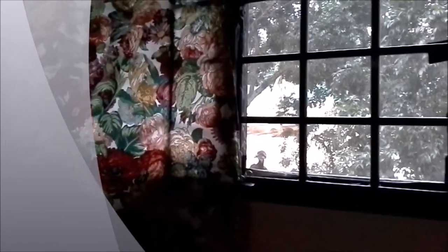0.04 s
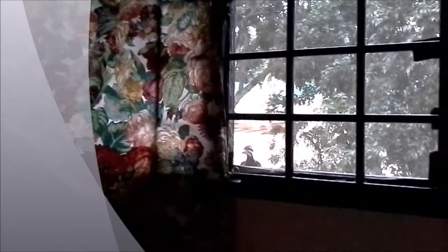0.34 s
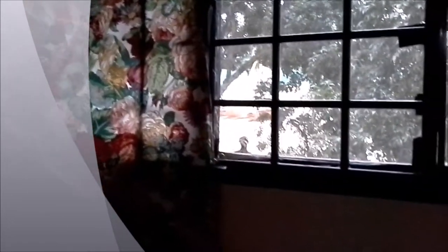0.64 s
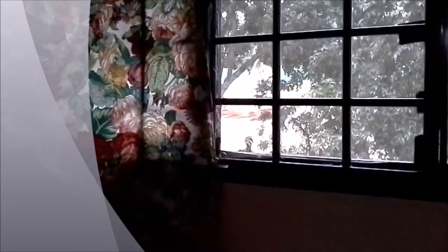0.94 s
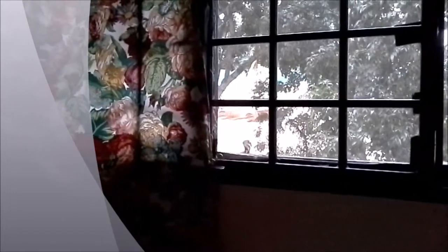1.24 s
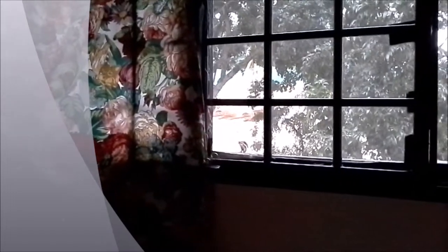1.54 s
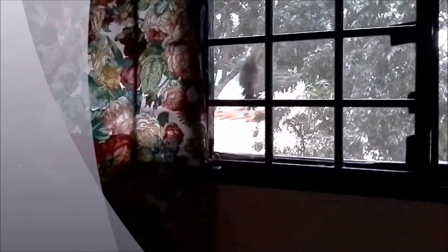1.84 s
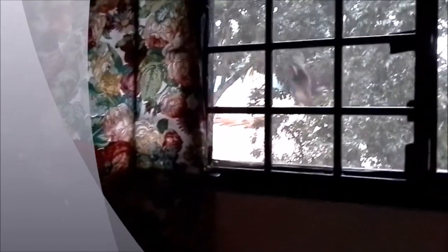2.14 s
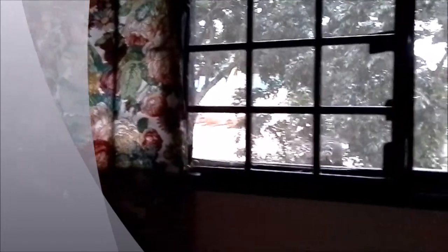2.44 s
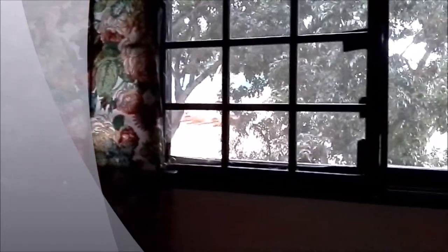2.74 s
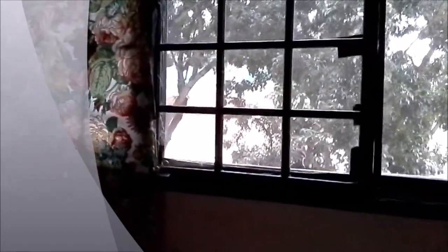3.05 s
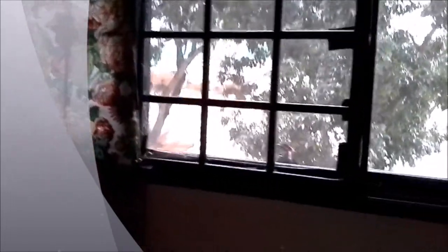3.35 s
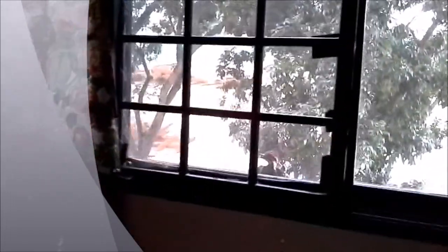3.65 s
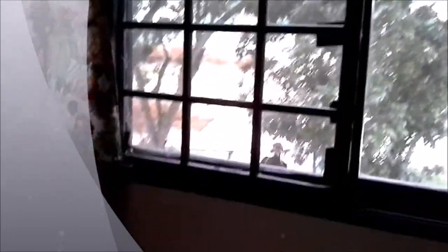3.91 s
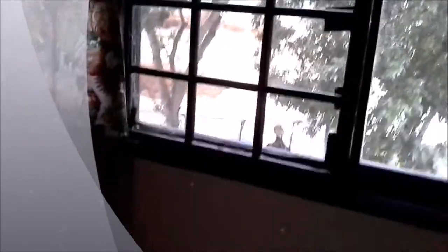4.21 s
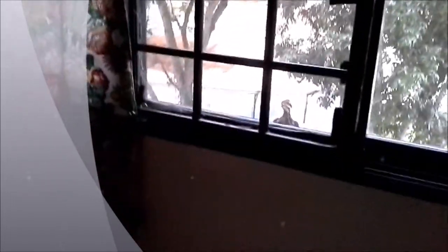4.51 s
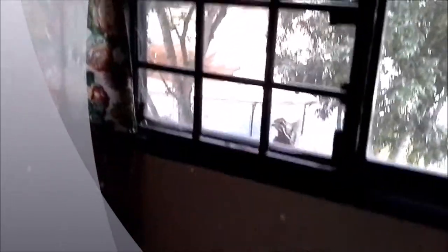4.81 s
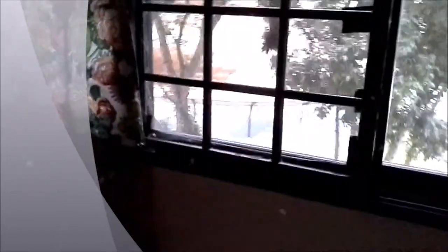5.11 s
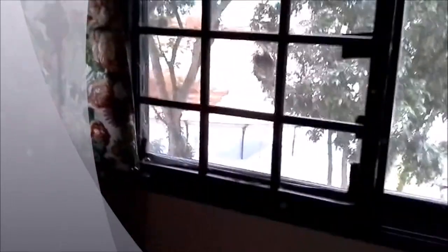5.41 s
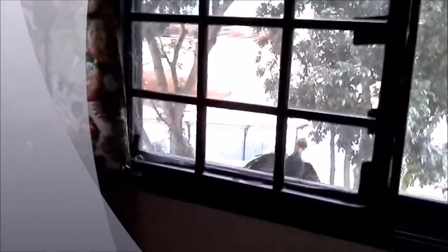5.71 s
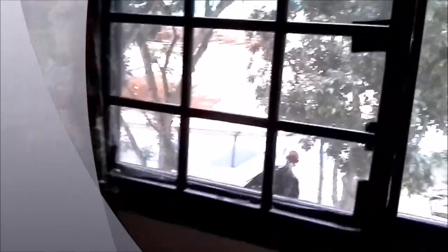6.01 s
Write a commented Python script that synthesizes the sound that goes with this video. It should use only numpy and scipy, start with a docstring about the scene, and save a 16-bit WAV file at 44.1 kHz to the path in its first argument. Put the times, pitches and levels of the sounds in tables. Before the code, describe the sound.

A bird knocks sharply three times on a barred window, with faint claw scratches, light taps and soft clothing rustle, heard from indoors.

```python
"""A woodpecker knocks three times on a steel-barred window, heard from inside a small room.
Each blow bends the pane, rattles it in its frame and sets the bars ringing. Around the blows
its claws scuff and squeak, and there are a few light taps. Clothing rustles as someone carries
a phone, and a quiet hum from outdoors comes through the glass all the while."""
import sys
import numpy as np
from scipy import signal
from scipy.fft import rfft, irfft, next_fast_len
from scipy.io import wavfile
from scipy.ndimage import uniform_filter1d

SR = 44100
rng = np.random.default_rng(int(sys.argv[2]) if len(sys.argv) > 2 else 0)


def dump_mix(stems):
    """Bounce the given channels to the path in sys.argv[1] as a 16-bit WAV at rate SR."""
    frames = np.atleast_2d(stems).T  # one column per channel
    limited = np.clip(frames, -1, 1)  # hard clip at full scale
    pcm = np.round(limited * 32767).astype(np.int16)
    wavfile.write(sys.argv[1], SR, pcm)


N = 267510
TOP_HZ = 14750


def undb(db):
    """Turn decibels into a number to multiply a sound by."""
    return 10 ** (np.asarray(db) / 20)


def lookup(points, hz):
    """Read between (frequency, value) points, giving every octave the same width."""
    f, value = np.transpose(points)
    return np.interp(np.log(np.maximum(hz, 1)), np.log(f), value)


def wander(rate_hz):
    """A smooth random drift, usually between about -1 and 1."""
    step = max(int(SR / rate_hz), 1)
    x = uniform_filter1d(np.repeat(rng.standard_normal(N // step + 1), step), step)[:N]
    return x / x.std()


def ring(modes, t, scatter_db=0, apart=0):
    """A struck thing rings in fading tones (modes), each reaching an ear up to `apart` cycles late."""
    sound = 0
    for hz, db, t60 in modes:  # t60 is the time to fade by 60 dB
        strength = undb(db + scatter_db * rng.uniform(-1.24, 1))
        fade = np.exp(-np.log(1000) * t / t60)
        lag = apart * rng.random((2, 1))
        sound = sound + strength * fade * np.sin(2 * np.pi * (hz * t - lag))
    return sound


def add(track, s, sound):
    """Mix a sound into the track, starting at s seconds."""
    i = int(s * SR)
    track[:, i:i + sound.shape[-1]] += sound[..., :N - i]


# how alike the two ears hear a noise (1 is identical): f/Hz, likeness
EAR_LIKENESS = [(60, 0.68), (125, 0.65), (250, 0.63), (500, 0.44), (1000, 0.059), (4000, 0.039)]


def noise(colour, size):
    """Stereo noise, alike in both ears in the bass; its colour sets how strong each frequency is."""
    padded = next_fast_len(size)
    hz = np.fft.rfftfreq(padded, 1 / SR)
    alike = np.clip(lookup(EAR_LIKENESS, hz), -1, 1)
    mid, side = np.exp(2j * np.pi * rng.random((2, len(hz))))
    pair = mid * np.sqrt(1 + alike) + np.array([[1], [-1]]) * side * np.sqrt(1 - alike)
    x = irfft(pair * undb(lookup(colour, hz)) * (hz > 20) * (hz < TOP_HZ), padded)[:, :size]
    return x / x.std()


# colour of the room's echo: f/Hz, level/dB
TAIL_COLOUR = [(50, -0.5), (160, 7.5), (400, 5.5), (1000, 5.5), (2500, 2.5), (5000, 0.5), (8000, 2),
               (10500, -0.5), (14000, -7)]
# how long that echo lasts: f/Hz, fade time/s
TAIL_FADE = [(100, 0.4), (400, 0.29), (1500, 0.28), (4000, 0.26), (8000, 0.27), (14000, 0.41)]
# first echoes off the window recess and floor: left delay/s, right delay/s, gain
FIRST_ECHOES = [(.0022, .0024, 0.32), (.0042, .0041, 0.18), (.0060, .0059, .42)]


def room(x, direct_db, wet_db, build_s):
    """A sound arrives directly, then as three quick echoes and a fading wash of many more (wet_db)."""
    t = np.arange(SR // 2) / SR
    hz = np.fft.rfftfreq(len(t), 1 / SR)
    spectrum, tail = rfft(noise(TAIL_COLOUR, len(t))), 0
    for centre, t60 in TAIL_FADE:
        band = lookup([(f, float(f == centre)) for f, _ in TAIL_FADE], hz)
        tail = tail + irfft(spectrum * band, len(t)) * np.exp(-np.log(1000) * t / t60)
    tail *= 1 - np.exp(-t / build_s)
    response = undb(wet_db) * tail / np.sqrt(np.sum(tail ** 2) / 2)
    response[:, 0] += undb(direct_db)
    for left_s, right_s, gain in FIRST_ECHOES:
        response[[0, 1], [int(left_s * SR), int(right_s * SR)]] += gain * undb(direct_db)
    return signal.fftconvolve(x, response, axes=1)[:, :x.shape[-1]]


# colour of the outdoor hum: f/Hz, level/dB
HUM_COLOUR = [(25, -13), (45, -11.5), (85, -3), (150, -1.5), (260, -7), (400, -6), (600, -6.5), (1000, -13),
              (1800, -18.5), (3500, -22), (8000, -23.5), (14500, -25)]


def outdoors(level_db=-64.5):
    """A dull, steady hum comes through the closed window, with a thin hiss on top."""
    return noise(HUM_COLOUR, N) * undb(level_db)


CARRIED_FROM_S = 3.0
# sweeps of clothing: start/s, fullest/s, end/s, level/dB, swell from either end to the fullest/dB
CLOTH_SWEEPS = [(2.99, 4.1, 4.61, -56, 9), (4.964, 5.723, 5.83, -59.3, 1.8)]


def sliding(held_db=-81, carried_db=-73.5, attack_s=0.037, release_s=0.037, peakedness=1.7):
    """How hard the fabric slides: never quite still, more once the phone is carried, most in sweeps."""
    t = np.arange(N) / SR
    power = undb(np.where(t < CARRIED_FROM_S, held_db, carried_db)) ** 2
    for start, fullest, end, db, swell_db in CLOTH_SWEEPS:
        moving = np.clip((t - start) / attack_s, 0, 1) * np.exp(-np.maximum(t - end, 0) / release_s)
        up_and_down = np.interp(t, [start, fullest, end], [0, 1, 0])
        arc = np.sin(np.pi / 2 * up_and_down ** peakedness) ** 2
        power = power + (moving * undb(db - swell_db * (1 - arc))) ** 2
    return np.sqrt(power)


# colours of the fabric's fine hiss and its dull rub: f/Hz, level/dB
HISS_COLOUR = [(400, -17), (1000, -0.5), (2000, -2.5), (4500, -4), (7000, -0.5), (9000, -5.5),
               (14500, -17.5)]
RUB_COLOUR = [(30, -15.5), (90, -7), (170, -4), (350, -8.5), (700, -10), (1400, -20), (4000, -29.5)]


def clothing(flutter_db=1.0, grain_db=0.5, rub_db=-1.16, arm_db=-69, uneven_db=0.7):
    """Fabric slides over fabric: a fine hiss above a soft, uneven rub."""
    slide = sliding()
    carrying_arm = undb(arm_db) * (np.arange(N) / SR > CARRIED_FROM_S)
    rub = np.hypot(undb(rub_db) * slide, carrying_arm) * undb(uneven_db * wander(7.9))
    drag = undb(flutter_db * wander(24.79) + grain_db * wander(500))
    return drag * (slide * noise(HISS_COLOUR, N) + rub * noise(RUB_COLOUR, N))


# colours of a scratch, the hollow frame and a claw's crackling edge: f/Hz, level/dB
SCRATCH_COLOUR = [(900, -26), (2000, -16), (3200, -12.5), (4500, -12.5), (6000, -1.5), (7300, -1),
                  (9000, -6), (11500, -11.5), (14500, -18)]
FRAME_COLOUR = [(60, -6), (150, 2), (400, -3), (800, 1), (1300, -3.5), (1800, -11.5), (3000, -12),
                (6000, -27)]
CRACKLE_COLOUR = [(600, -3.5), (1300, 6), (1900, 1.5), (2800, 3.5), (5000, 11), (9000, -18), (14000, -15)]
# scuffs: t/s, level/dB, length/s, frame/dB, crackle/dB, second foot later by/s, and louder by/dB
CLAW_SCUFFS = [(0.438, -51.5, 0.07, -11, -12.5, .05, 3.5), (0.797, -54, 0.024, -6.5, -14, 0.051, 4.5),
               (1.804, -55.5, 0.047, -8.5, -14, 0.046, 2), (2.4934, -34, 0.041, -7, -6, 0.12, -17),
               (4.261, -42, 0.016, -11, -2, .02, 4.5), (5.012, -51, 0.015, -3, -14, 0.045, -5),
               (5.293, -47.5, 0.016, -18, -8, .016, -1), (5.728, -45.5, .036, -5, -9, .074, -7.5)]


def scuffs(grit_db=3.0, graze_s=0.016, graze_db=-19.5, edge_s=0.0044, release_s=0.0055, slowing_db=5.5):
    """One foot slides, then the other: each claw brushes, bites and slows, and the frame answers."""
    out = np.zeros((2, N))
    t = np.arange(SR // 5) / SR - graze_s  # the claw bites at t = 0
    for s, db, length_s, frame_db, crackle_db, later_s, second_db in CLAW_SCUFFS:
        bite = np.clip(t / edge_s, undb(graze_db), 1)
        slowing = undb(-slowing_db * np.maximum(t, 0) / length_s)
        contact = bite * slowing * np.exp(-np.maximum(t - length_s, 0) / release_s)
        for start, foot_db in (s, db), (s + later_s, db + second_db):
            scratch = noise(SCRATCH_COLOUR, len(t))
            frame = undb(frame_db) * noise(FRAME_COLOUR, len(t))
            crackle = undb(crackle_db) * noise(CRACKLE_COLOUR, len(t))
            add(out, start - graze_s, undb(foot_db) * contact * (scratch + frame + crackle))
    return room(out * undb(grit_db * wander(600)), direct_db=-4.5, wet_db=-5.0, build_s=0.00083)


# thin squeaks: t/s, level/dB, f/Hz, time to swell/s
CLAW_SQUEAKS = [(0.457, -51.5, 7340, 0.0079), (0.794, -56.5, 6650, 0.0049), (1.808, -53.5, 7400, 0.0047),
                (4.2366, -39, 6500, 0.0042), (4.292, -65, 2760, 0.011), (4.975, -58.5, 5354, 0.0066),
                (5.03, -43.5, 7150, 0.0039), (5.305, -60, 4600, 0.0057)]


def squeaks(drop_db_per_half_octave=19):
    """A claw slips and sings briefly: noise gathered closely around one pitch."""
    out = np.zeros((2, N))
    t = np.arange(SR // 10) / SR
    for s, db, hz, swell_s in CLAW_SQUEAKS:
        band = [(hz * 2 ** (k / 2), -drop_db_per_half_octave * abs(k)) for k in range(-3, 4)]
        swell = t / swell_s * np.exp(1 - t / swell_s)
        add(out, s, undb(db) * noise(band, len(t)) * swell)
    return room(out, direct_db=0.5, wet_db=-4, build_s=0.0067)


# faint taps: t/s, level/dB, f/Hz of the tapped spot, knock/dB
LIGHT_TAPS = [(0.8464, -47, 860, -5), (2.499, -37.5, 1285, 6), (2.936, -37, 670, -9),
              (4.4753, -44.5, 1360, -16), (5.0992, -39, 1090, -23)]


def taps(click_s=0.0022, crackle_db=-4, knock_fade_s=0.014):
    """Light taps at the window, one as the bird lands: a dry click and a tiny knock."""
    out = np.zeros((2, N))
    t = np.arange(SR // 10) / SR
    for s, db, hz, knock_db in LIGHT_TAPS:
        grit = noise(SCRATCH_COLOUR, len(t)) + undb(crackle_db) * noise(CRACKLE_COLOUR, len(t))
        click = grit * np.exp(-t / click_s)
        knock = ring([(hz, knock_db, knock_fade_s)], t)
        add(out, s, undb(db) * (click + knock))
    return room(out, direct_db=-8, wet_db=-1, build_s=0.0015)


# tones of the rattling glass, the bars and frame, and the whole pane: f/Hz, level/dB, fade time/s
RATTLE_TONES = [(740, -4.5, 0.015), (1010, 0, 0.014), (1328, 1.5, 0.0096), (1725, 1.5, 0.011),
                (2390, 1.5, 0.01), (2684, -2, 0.016), (3185, -2.5, 0.017), (3650, -1.5, 0.014)]
BAR_TONES = [(174.6, -11, 0.12), (234, -7, 0.17), (269, 7.5, 0.25), (330, -12, 0.16), (416, 1, 0.19),
             (545, 11.5, 0.082), (606, 16.5, 0.14), (710, 6, 0.25), (790, -7, 0.2), (896, 2, 0.28),
             (992, 6, 0.25), (1136, -13, 0.37), (1313, -15.5, 0.54), (1380, 1, 0.2), (1730, -9, 0.16),
             (2020, -6, 0.14), (2100, -3, 0.19), (2630, -18, .15), (2820, -5, 0.18), (3530, -28, .14)]
PANE_TONES = [(93.4, -1, 0.92), (98.5, -11, 0.43)]
# colour of the beak's sharp tick: f/Hz, level/dB
TICK_COLOUR = [(1500, 6.5), (4000, 9.5), (7500, 5.5), (10000, -3.5), (14500, -16)]
# blows: t/s, level/dB, bend f/Hz, rattle/dB, rattle f/Hz, tick/dB, bars/dB, boom/dB
BEAK_BLOWS = [(1.9203, -14, 510, -8, 2340, -14.5, -31, -45),
              (2.1887, -18.5, 400, -10.5, 2840, -17, -29, -36.5),
              (5.1653, -7.5, 780, -10.5, 1331, -21.5, -31.5, -33.5)]


def knocks(bend_cycles=0.26, bass_cut_hz=150, rattle_rise_s=0.0013, rattle_slope_db=3,
           tick_s=0.0013, bars_rise_s=0.0051, boom_rise_s=0.013):
    """Each blow pushes the pane in and it springs back; the glass buzzes and the bars ring on."""
    out = np.zeros((2, N))
    t = np.arange(SR) / SR
    # a small pane moves little air in the bass
    bass_cut = signal.butter(2, bass_cut_hz, "high", fs=SR, output="sos")
    for s, db, bend_hz, rattle_db, rattle_hz, tick_db, bars_db, boom_db in BEAK_BLOWS:
        bend = np.sin(2 * np.pi * bend_hz * t) * np.exp(-(bend_hz * t / bend_cycles) ** 2)
        # the struck spot favours the tones near its own pitch
        favoured = [(hz, tone_db - rattle_slope_db * np.log2(hz / rattle_hz) ** 2, t60)
                    for hz, tone_db, t60 in RATTLE_TONES]
        rattle = ring(favoured, t, apart=0.92) * (1 - np.exp(-(t / rattle_rise_s) ** 2))
        blow = signal.sosfilt(bass_cut, bend + undb(rattle_db) * rattle)
        tick = undb(tick_db) * noise(TICK_COLOUR, len(t)) * np.exp(-t / tick_s)
        # every spot has its own paths through the room; the tick comes back late off the far wall
        crack = room(blow, direct_db=4.5, wet_db=-2.5, build_s=0.001)
        crack += room(tick, direct_db=6, wet_db=7, build_s=0.0094)
        # the bars and the whole pane take a moment to start swinging
        bars = ring(BAR_TONES, t, scatter_db=5.5, apart=0.63) * (1 - np.exp(-t / bars_rise_s))
        boom = ring(PANE_TONES, t) * (1 - np.exp(-t / boom_rise_s))
        add(out, s, undb(db) * (crack + undb(bars_db) * bars + undb(boom_db) * boom))
    return out


def scene():
    """The bird at the window, over the rustle and the hum."""
    return knocks() + scuffs() + squeaks() + taps() + clothing() + outdoors()


def record(dry):
    """The phone cuts off the very highest treble."""
    treble_cut = signal.ellip(10, 0.2, 70, TOP_HZ, fs=SR, output="sos")
    return signal.sosfilt(treble_cut, dry)


dry = scene()
out = record(dry)
dump_mix(out)
```